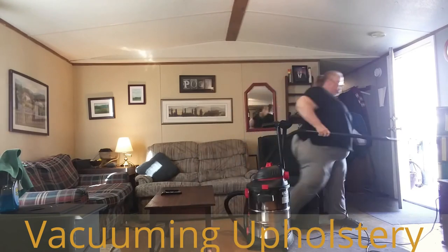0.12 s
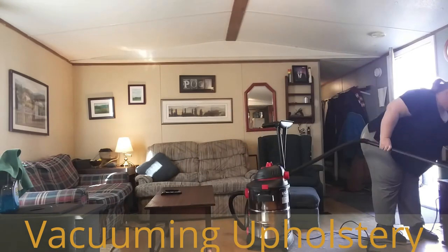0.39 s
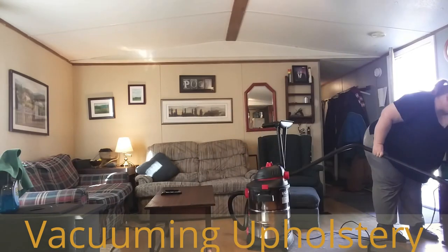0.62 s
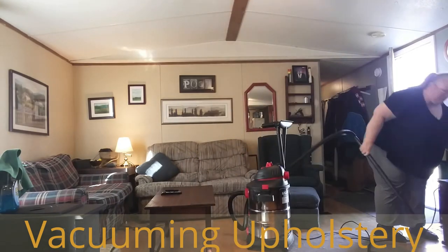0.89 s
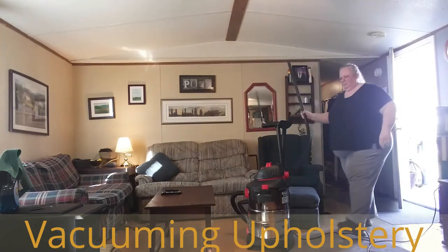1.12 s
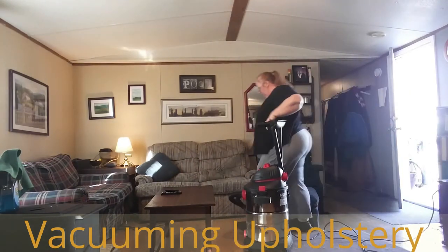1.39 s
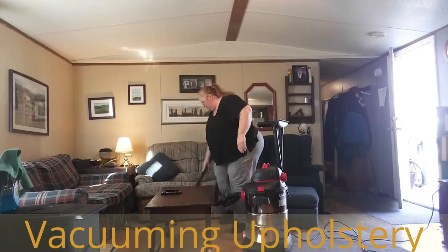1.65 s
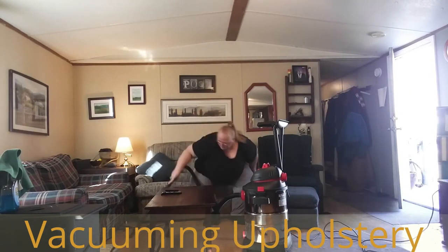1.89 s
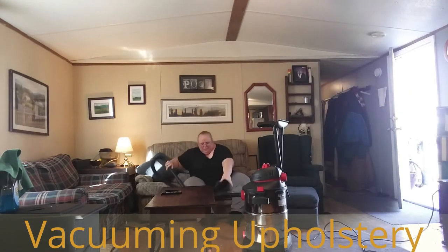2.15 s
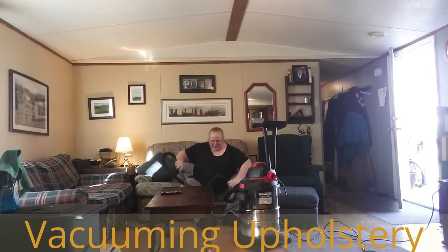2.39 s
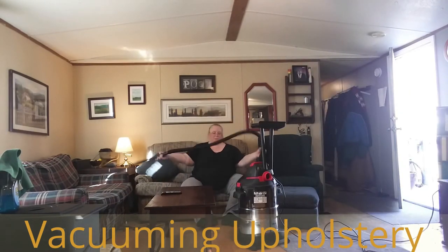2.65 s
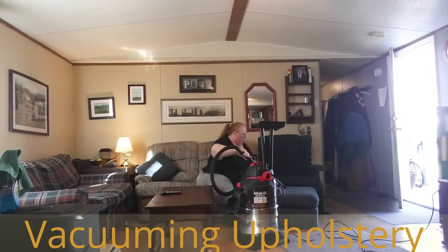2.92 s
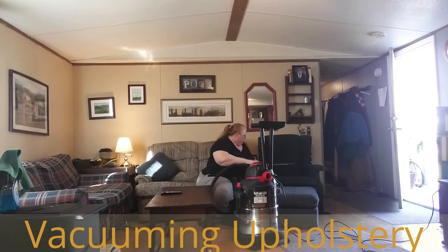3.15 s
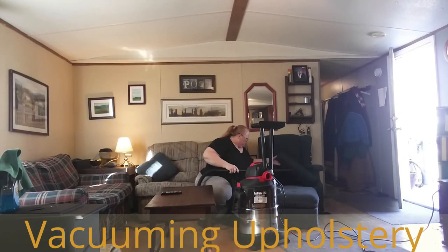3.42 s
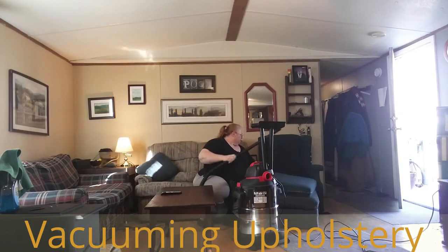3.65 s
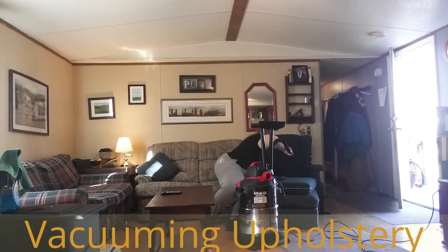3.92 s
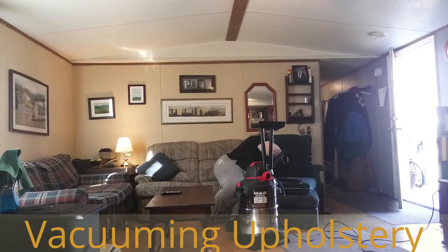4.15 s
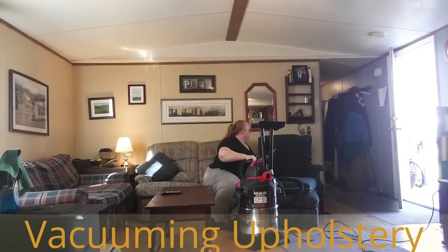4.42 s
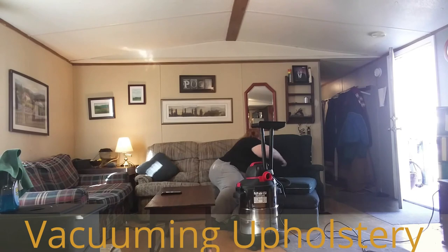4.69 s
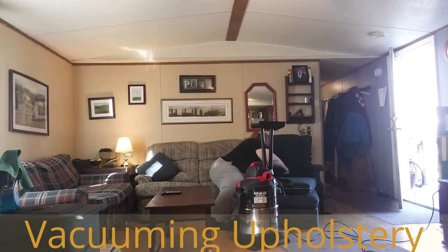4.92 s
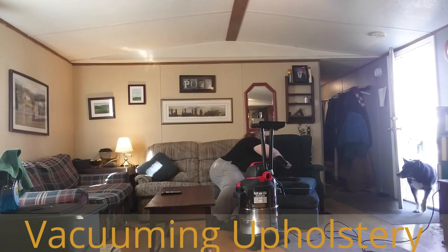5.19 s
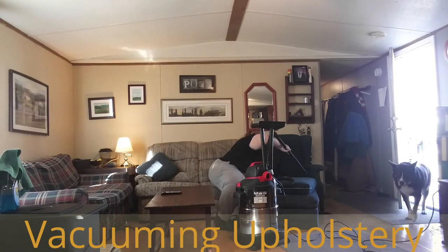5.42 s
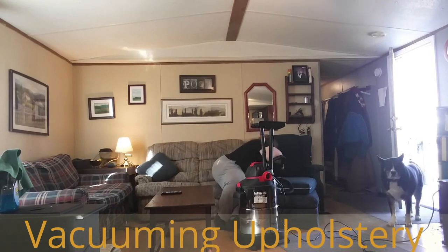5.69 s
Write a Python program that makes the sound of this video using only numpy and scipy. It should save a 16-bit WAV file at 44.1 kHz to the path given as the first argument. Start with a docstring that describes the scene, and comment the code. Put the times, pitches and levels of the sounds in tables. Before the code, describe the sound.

A small living room, captured in mono and sounding sped up and high-pitched. From 0 to 0.7 seconds there is quiet room noise with faint wavering appliance tones. Small hose knocks click in the first 0.15 seconds, a thin metallic ring follows, and soft cloth scuffs rustle around 0.3 to 0.5. At about 0.77 a canister vacuum cleaner bursts on, its motor sweeping up within roughly a tenth of a second into a shrill whine, with mains hum and a dense, bright roar of air. The whine wavers in strength at first, then steadies. Around 2.0 and 3.0 the nozzle seals on cloth, with a brief pitch rise, hiss and whistle. Near 2.35 the room colouring changes and the roar grows slightly. From 3.8 onward, these suction catches come often, clustering around 4.4 to 5.3, while the motor runs on to the end at 5.8.

```python
"""A canister vacuum cleaner in a small living room, heard fast and pitched high, by a mono microphone.
The motor spins up from sines on the shaft orders, mains hum and noise bands of air roar, the air coloured
by drum and room resonances. When the nozzle seals on cloth the unloaded fan speeds up, the gap hisses
and narrow noise bands whistle. Before the start, noise bursts make faint rustles and ticks over the
room noise, which carries a few wavering tones."""
import sys
import numpy as np
from scipy import signal
from scipy.fft import rfft, irfft
from scipy.io import wavfile
from scipy.ndimage import uniform_filter1d

SR = 44100
rng = np.random.default_rng(int(sys.argv[2]) if len(sys.argv) > 2 else 0)


def ratio_of_db(decibels):
    """Turn decibels (scalar or array-like) into linear amplitude factors; 0 dB maps to 1."""
    return 10 ** (np.asarray(decibels, float) / 20)


def transcribe(u):
    """Save the signal u as a 16-bit wav file named by the first command-line argument.

    u: samples, shape (n,) or (channels, n), limited to [-1, 1]; the rate is SR.
    q: integer samples, one column per channel.
    """
    v = np.clip(np.atleast_2d(u).T, -1, 1)
    q = np.round(v * 32767).astype(np.int16)
    wavfile.write(sys.argv[1], SR, q)


N = 256220
T = np.arange(N) / SR  # s
F = np.maximum(np.arange(N // 2 + 1) * SR / N, 1)  # Hz
AUDIBLE_S = 0.768  # the motor layers are fully open
# the nozzle seals on cloth: [centre t/s, length/s, hiss level/dB, low whistle level/dB, speed rise/%]
# (hiss level ahead of the jet's own trim and the room)
NOZZLE_SEALS = [(0.944, 0.12, -35, -41, 0.21), (1.216, 0.12, -43, -36, 0.19), (1.96, 0.07, -29.5, -31, 4.8),
                (2.307, 0.075, -37, -48, 0.42), (2.965, .085, -31, -31, 5.5),
                (3.791, 0.061, -33, -34.5, 1.4), (3.911, 0.052, -26.5, -38, 2.7),
                (4.1, 0.13, -37, -39, 1.3), (4.409, 0.085, -32, -32, 4.7), (4.497, 0.1, -28, -35, 7.6),
                (4.585, .06, -31, -34, 5.2), (4.732, 0.065, -29.5, -30, 4.5), (4.851, .05, -34, -35, 1.87),
                (4.947, 0.068, -31, -33, 3.4), (5.12, 0.09, -36, -29, 2.8), (5.24, 0.16, -35.5, -28, 1.7),
                (5.473, .1, -36, -33, 1.9), (5.7, 0.16, -34, -34, 1.4)]


def unit(x):
    """Scale to rms 1."""
    return x / np.sqrt(np.mean(x ** 2))


def colour(points):
    """Gain over frequency from [f/Hz, level/dB] points, joined on a log frequency axis."""
    hz, db = np.transpose(points)
    return ratio_of_db(np.interp(np.log(F), np.log(hz), db))


def noise(gain):
    """Noise with the given gain over frequency."""
    return irfft(rfft(rng.standard_normal(N)) * gain, N)


def walk(rate):
    """Random levels held 1 / rate s and slewed twice; spread near 1."""
    hold = int(SR / rate)
    steps = np.repeat(rng.standard_normal(N // hold + 1), hold)
    slewed = uniform_filter1d(uniform_filter1d(steps, hold), hold)
    return 1.15 * slewed[:N]


def curves(table):
    """Columns of a table joined by straight lines in time."""
    s, *columns = np.transpose(table)
    return [np.interp(T, s, column) for column in columns]


def ramp(start_s, length_s):
    """From 0 to 1 in a straight line."""
    return np.clip((T - start_s) / length_s, 0, 1)


def turns(speed_hz, waver):
    """Shaft angle in radians, the summed speed with a random relative waver."""
    return 2 * np.pi * np.cumsum(speed_hz * (1 + waver * walk(60))) / SR


def colouring(bumps):
    """Resonances (plus dB) and cancellations (minus dB) in series."""
    return ratio_of_db(sum(db / (1 + (2 * (F - hz) / width) ** 2) for hz, width, db in bumps))


def quiet_room():
    """Room noise, shaped broadband noise, with a few tones that waver in pitch and level."""
    # shape of the room noise: [f/Hz, relative level/dB]
    room_spectrum = [(40, -58), (150, -51), (210, -20.5), (270, -20.5), (335, -1.5), (420, -8), (500, -12),
                     (590, -13), (760, -6.5), (900, -13.5), (1100, -11.5), (2500, -15.5), (3150, -24),
                     (3700, -13), (5300, -19.5), (7500, -24), (15600, -34)]
    # other appliances: [f/Hz, rms level/dB]
    appliance_tones = [(222, -74.5), (721, -67), (2160, -63.5), (4320, -73), (5310, -63.5)]
    out = unit(noise(colour(room_spectrum))) * ratio_of_db(-49.5 + 1.4 * walk(22))
    for hz, db in appliance_tones:
        phase = 2 * np.pi * np.cumsum(hz + 11 * walk(60)) / SR
        out += np.sqrt(2) * ratio_of_db(db + 2.0 * walk(45)) * np.sin(phase)
    return out


def burst(s, db, hz, width, rise_s, t60_s):
    """A band of noise that swells to its peak at s and dies away, within the first second."""
    t, f = T[:SR], np.maximum(np.arange(SR // 2 + 1), 1)
    band = 1 / (1 + ((f / hz - hz / f) * hz / width) ** 2)
    grain = unit(irfft(rfft(rng.standard_normal(SR)) * band, SR))
    swell = np.exp(np.minimum(t - s, 0) / max(rise_s, 1e-4))
    decay = ratio_of_db(-60 * np.maximum(t - s, 0) / t60_s)
    return grain * np.where(t < s, swell, decay) * ratio_of_db(db) / 2


def ticks():
    """Hose and wand knocks: noise bursts with a very fast rise, as wide as their centre frequency."""
    # knocks: [peak t/s, level/dB ahead of the burst's halving, centre f/Hz, t60/s]
    knocks = [(.001, -37, 586, .15), (.093, -36, 1300, 0.027), (0.1027, -31, 4700, 0.049),
              (.1401, -38.5, 7000, .06), (.436, -54, 11000, .05), (.648, -48, 9000, .07)]
    return sum(burst(s, db, hz, hz, 0.0006, t60) for s, db, hz, t60 in knocks)


def scuffs():
    """Hose and wand scuff on cloth: a dull and a bright noise band swell and fade together."""
    # scuffs: [peak t/s, dull level/dB, bright level/dB], levels ahead of the burst's halving
    cloth_rubs = [(.267, -39.5, -40), (.307, -39.5, -43), (.365, -54, -58), (.4, -50, -60),
                  (.459, -46, -41), (.492, -38, -46), (.575, -58, -55)]
    # dull and bright part: [centre f/Hz, width/Hz]
    rub_bands = [(2100, 1100), (6200, 6000)]
    rise_s, t60_s = 0.012, 0.1
    out = np.zeros(SR)
    for s, *parts_db in cloth_rubs:
        for db, (hz, width) in zip(parts_db, rub_bands):
            out += burst(s, db, hz, width, rise_s, t60_s)
    return out


def ping():
    """A small metal part rings: one thin sine that decays with a flickering level."""
    # ring: [onset t/s, peak level/dB, f/Hz, t60/s]
    metal_ring = (.147, -52, 8870, .3)
    s, db, hz, t60 = metal_ring
    decay_db = db - 60 * np.maximum(T - s, 0) / t60
    return (T > s) * ratio_of_db(decay_db + 2.4 * walk(75)) * np.sin(2 * np.pi * hz * T)


def handling():
    """Short scuffs and ticks of noise, and one thin ring."""
    out = ping()
    out[:SR] += ticks() + scuffs()
    return out


def hum():
    """Torque ripple of the mains, strongest under the starting current."""
    hum_hz, start_db, run_db, settle_s = 719, -44.5, -49, 0.55
    since = np.maximum(T - AUDIBLE_S, 0)
    db = run_db + (start_db - run_db) * np.exp(-since / settle_s) + 0.51 * walk(14)
    return np.sqrt(2) * ratio_of_db(db) * np.sin(turns_of_hum(hum_hz))


def turns_of_hum(hum_hz):
    """Phase of the hum in radians, its pitch slightly unsteady."""
    return 2 * np.pi * np.cumsum(hum_hz * (1 + 0.003 * walk(20))) / SR


def late_echoes(depth_db, spacing_hz, from_hz):
    """Many late reflections ripple the top of the spectrum at random."""
    knots = np.arange(0, SR / 2, spacing_hz)
    ripple = np.interp(F, knots, rng.standard_normal(len(knots)))
    return ratio_of_db(depth_db * ripple / (1 + (from_hz / F) ** 12))


def in_room(x):
    """The room's pattern of peaks and notches changes as the user sits down."""
    # peaks and notches of the drum and its surroundings: [f/Hz, width/Hz, level/dB]
    drum_bumps = [(878, 136, -23), (950, 288, 15), (1055, 215, -11.5), (1423, 312, 5.5), (1577.4, 45, 7),
                  (1678, 35, -3), (1790, 38, -12), (1964, 234, 14), (2034, 243, -14.5), (2530, 370, 7),
                  (2490, 80, -15), (2676, 75, -6), (3205, 94, -3.5), (3334, 146, 7), (3631, 74, -20.5),
                  (3643, 236, 10.5), (3797, 46, -14.5), (3910, 260, 5), (4020, 50, -10), (4283, 43, -17.5),
                  (4349, 136, 10), (4500, 61, -4.5)]
    # room while the user stands by the drum: [f/Hz, width/Hz, level/dB]
    standing_bumps = [(1554, 330, -3.5), (2030, 100, -4.5), (2270, 36, 4), (2710, 26, -18), (3300, 31, -3),
                      (3640, 26, 20), (3788, 50, 8.5), (4030, 71, -9.5), (4048, 160, 17), (4145, 400, -14),
                      (4283, 84, 13), (4520, 76, 9), (5430, 61, -4), (5560, 252, 7), (5680, 97, -14),
                      (5880, 66, 5), (6090, 80, 9.5), (6900, 290, -3.5), (6980, 210, 12), (7570, 86, 7.5),
                      (7920, 104, -8), (8360, 123, -5), (8579, 50, 9), (8720, 110, -10), (8860, 110, -4),
                      (9050, 40, -16), (9170, 162, 7), (10080, 190, 7), (10629, 36, 0), (11440, 309, -3),
                      (11510, 298, 8), (13900, 900, 4)]
    # room while the user sits behind the drum: [f/Hz, width/Hz, level/dB]
    seated_bumps = [(4899, 88, -6), (5505, 65, 7), (5705, 44, -5), (6008, 335, -3), (6243, 94, 5),
                    (6353, 61, -5), (6634, 113, -6), (7168, 196, 3), (7743, 151, -5), (8091, 256, 16),
                    (8166, 314, -14), (8629, 56, -6), (9061, 113, -12), (9458, 128, -16), (9552, 403, 15),
                    (9731, 223, -16), (9802, 67, 10), (9868, 36, -5), (10002, 101, 7), (10350, 92, 16),
                    (10406, 205, -16), (10496, 144, 14), (10649, 55, -8), (11157, 82, -3), (11549, 103, 9),
                    (12126, 113, -5), (12882, 287, -12), (13015, 364, 11), (13360, 195, -9), (14061, 54, 6)]
    sit_s, sit_span_s = 2.354, 0.17  # centre and length of the crossfade
    seated = np.clip((T - sit_s) / sit_span_s + 0.5, 0, 1)
    echoes = late_echoes(depth_db=3.0, spacing_hz=70.9, from_hz=12500)
    heard = rfft(x) * colouring(drum_bumps) * echoes
    while_standing = irfft(heard * colouring(standing_bumps), N)
    while_seated = irfft(heard * colouring(seated_bumps), N)
    return (1 - seated) * while_standing + seated * while_seated


def strokes():
    """How far the nozzle is closed, one flat-topped bump per seal."""
    return [np.exp(-((T - row[0]) / row[1] * 2) ** 4) for row in NOZZLE_SEALS]


def breathy(turn, multiple, width_hz):
    """A narrow band of noise that rides on a multiple of the shaft speed."""
    band = 1 / (1 + (2 * F / width_hz) ** 2)
    drift = unit(noise(band)) + 1j * unit(noise(band))
    return np.real(drift * np.exp(1j * multiple * turn))


def nozzle(turn):
    """Air forced through the gap hisses, and breathy whistles ride up with the fan speed."""
    # upper whistles: [multiple of shaft speed, width/Hz, level/dB relative to the hiss level]
    upper_whistles = [(3.34, 110, -3), (3.681, 110, -3.5), (3.971, 110, -3), (4.329, 160, -2.5),
                      (4.919, 110, -18)]
    # low whistle: [multiple of shaft speed, width/Hz]
    low_whistle = (3.08, 37)
    jet_hz, jet_width_hz, jet_db = 8900, 4400, -4
    closed = strokes()
    hiss_gain = sum(ratio_of_db(row[2]) * stroke for row, stroke in zip(NOZZLE_SEALS, closed))
    low_gain = sum(ratio_of_db(row[3]) * stroke for row, stroke in zip(NOZZLE_SEALS, closed))
    jet_band = 1 / (1 + ((F - jet_hz) / jet_width_hz * 2) ** 6)
    jet = ratio_of_db(jet_db) * unit(noise(jet_band))
    jet += sum(ratio_of_db(db) * breathy(turn, multiple, width) for multiple, width, db in upper_whistles)
    return jet * hiss_gain + breathy(turn, *low_whistle) * low_gain


def roar():
    """Turbulent air in three bands; the drum speaks first, the treble builds last as the fan gathers speed."""
    # air flow once running: [t/s, roar level/dB ahead of the room, treble share/dB, drum share/dB]
    air_flow = [(.85, -22.5, 0.5, 1), (1.2, -22.5, 1.5, 3.5), (2.1, -22, 1.5, 3.5), (2.5, -20, -.5, 0),
                (4.0, -20, -0.5, 0), (4.6, -20, 0, 1), (5.81, -21, 0.5, 2)]
    # shape of the air noise: [f/Hz, relative level/dB]
    air_spectrum = [(160, -45.5), (330, -39), (560, -31.5), (800, -23.5), (1150, -22.5), (1550, -7),
                    (3150, -16), (3900, -5), (6400, -15.5), (7300, -11.5), (10300, -12), (12000, -22),
                    (13500, -22.5), (15700, -24.5)]
    start_s = 0.767
    roar_db, treble_db, drum_db = curves(air_flow)
    roar_db = roar_db - 18.5 * (1 - ramp(start_s, 0.056))  # climbs steadily in dB
    drum_db = drum_db + 10 * (1 - ramp(start_s, 0.045))
    treble_db = treble_db - 6 * (1 - ramp(start_s + 0.016, 0.012))
    air = colour(air_spectrum)
    low = 1 / (1 + (F / 2400) ** 8)
    high = 1 - 1 / (1 + (F / 5800) ** 8)
    between = np.clip(1 - low - high, 0, 1)
    drum = noise(air * np.sqrt(low)) * ratio_of_db(drum_db + 0.5 * walk(9))
    middle = noise(air * np.sqrt(between)) * ratio_of_db(1.1 * walk(8))
    treble = noise(air * np.sqrt(high)) * ratio_of_db(treble_db + 0.5 * walk(11))
    return unit(drum + middle + treble) * ratio_of_db(roar_db) * ramp(start_s, 0.0026)


def blades(turn):
    """The blade tone, seven times the shaft speed, sweeps through the top octave during spin-up."""
    # sweep: [centre t/s, length/s, peak level/dB]
    spin_up_sweep = (.86, .04, -43)
    s, length, db = spin_up_sweep
    return ratio_of_db(db) * np.exp(-((T - s) / length) ** 2) * np.sin(7 * turn)


def rotor():
    """Shaft speed lags behind the speed that the load allows; also the surge in percent."""
    # speed the rotor settles to with the nozzle open: [t/s, f/Hz]
    free_speed = [(.83, 2160), (.92, 2245), (1.03, 2284), (1.25, 2294), (1.44, 2278), (1.52, 2355),
                  (1.62, 2317), (2.3, 2321), (2.85, 2308), (3.7, 2318), (4.05, 2338), (4.3, 2347),
                  (5.35, 2350), (5.58, 2325), (5.81, 2349)]
    switch_s, inertia_s = 0.757, 0.038  # power on, time constant of the rotor
    keep = np.exp(-1 / (inertia_s * SR))

    def lag(x):
        """One-pole smoothing, the inertia of the rotor."""
        return signal.lfilter([1 - keep], [1, -keep], x)

    surge = sum(row[4] * stroke for row, stroke in zip(NOZZLE_SEALS, strokes()))
    allowed_hz = (T > switch_s) * curves(free_speed)[0] * (1 + surge / 100)
    return lag(allowed_hz), lag(surge)


def orders(speed_hz, surge):
    """Level in dB of the three shaft orders, the lower two fading as the fan races."""
    # whine ahead of surge and notch: [t/s, first order level/dB, second level/dB, third level/dB]
    whine_levels = [(.775, -56, -49, -68), (.8, -36, -48, -55), (.832, -23, -44, -39),
                    (.92, -24.5, -30, -47), (1.0, -33, -41, -46), (1.11, -50, -43, -44),
                    (1.19, -30, -32, -44), (1.3, -30.5, -35, -43), (1.41, -38, -42, -41),
                    (1.55, -29.5, -33, -34), (1.9, -36.5, -35, -32), (2.1, -32, -31.5, -37),
                    (2.38, -34, -33, -38), (2.5, -43, -32, -39), (2.9, -37.5, -30.5, -41),
                    (3.4, -38, -31.5, -34.5), (3.9, -41, -31, -45), (4.35, -39, -30, -45),
                    (5.0, -39, -32, -47), (5.81, -40, -32, -47)]
    # change with surge, one value per order: [level/dB per %]
    surge_slopes = (-1, -.9, 0)
    # the rising first order crosses a cancellation: [f/Hz, width/Hz, level/dB]
    first_order_notch = (2065, 36, -24)
    levels = [db + slope * surge for db, slope in zip(curves(whine_levels), surge_slopes)]
    hz, width, db = first_order_notch
    levels[0] = levels[0] + db / (1 + (2 * (speed_hz - hz) / width) ** 2)
    return levels


def whine(turn, orders_db):
    """Shaft orders of a slightly unsteady rotor: sines at multiples of its speed."""
    out = np.zeros(N)
    for order, db in enumerate(orders_db, start=1):
        out += np.sqrt(2) * ratio_of_db(db + 1.55 * walk(25.11)) * np.sin(order * turn)
    return out


def scene():
    """Motor layers start together over the room and handling; one microphone feeds both channels."""
    speed_hz, surge = rotor()
    turn = turns(speed_hz, waver=0.000654)
    # suction in the gap rises at once, the heavy rotor follows 0.02 s later
    suction = turns(np.interp(T + 0.02, T, speed_hz), waver=0.00099)
    on = np.clip((T - AUDIBLE_S) / 0.002 + 1, 0, 1)
    air = in_room(roar() + nozzle(suction))
    motor = on * (whine(turn, orders(speed_hz, surge)) + hum() + blades(turn) + air)
    mono = motor + quiet_room() + handling()
    return np.array([mono, mono])


def low_pass(x):
    """Removes everything above the highest recorded frequency."""
    return signal.sosfilt(signal.butter(12, 16600, fs=SR, output="sos"), x)


def record(dry):
    """The microphone housing dips once and the top is cut off sharply."""
    # dip of the housing: [f/Hz, width/Hz, level/dB]
    housing_dip = (3180, 300, -4.5)
    top_hz = 15750
    heard = rfft(dry) * colouring([housing_dip]) * (F < top_hz)
    return low_pass(irfft(heard, N))


dry = scene()
out = record(dry)
transcribe(out)
```